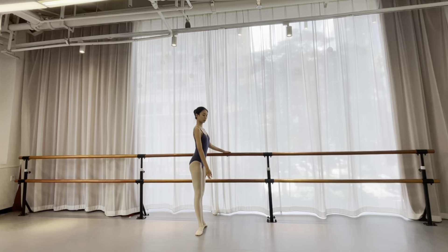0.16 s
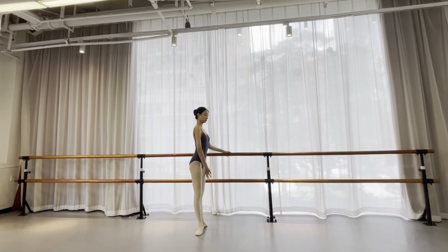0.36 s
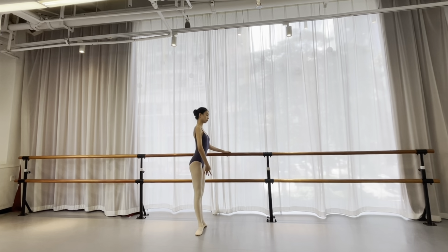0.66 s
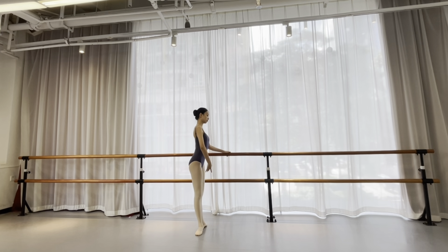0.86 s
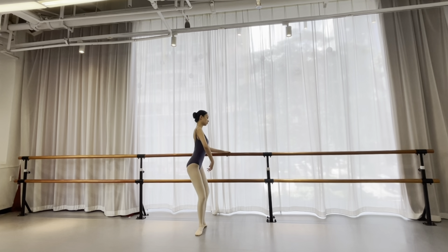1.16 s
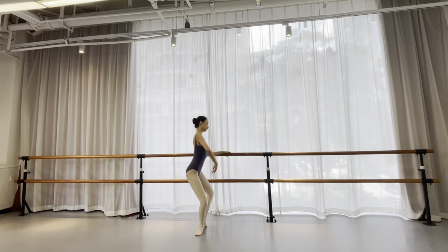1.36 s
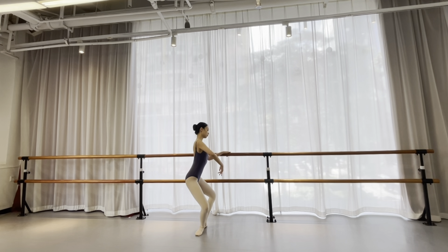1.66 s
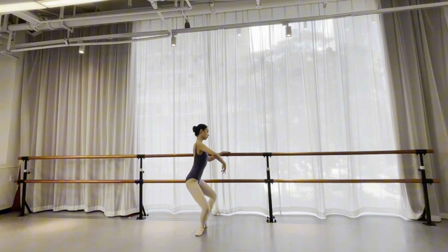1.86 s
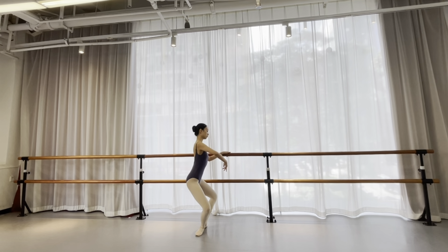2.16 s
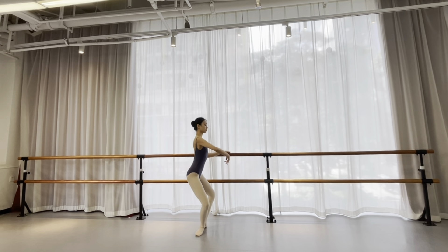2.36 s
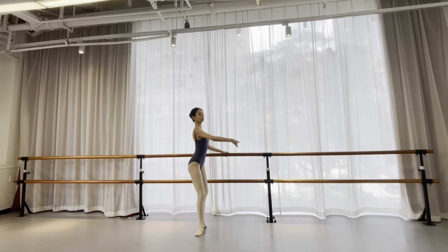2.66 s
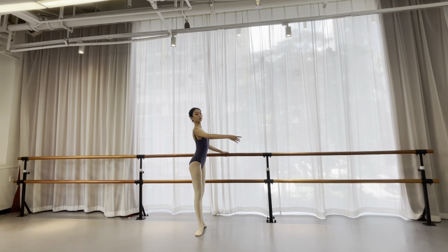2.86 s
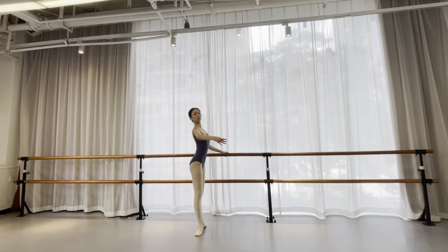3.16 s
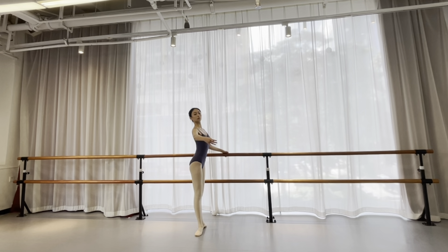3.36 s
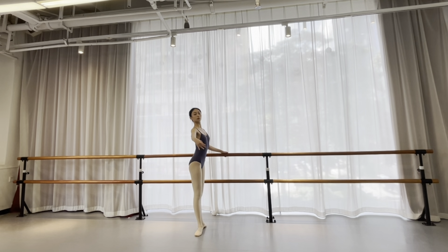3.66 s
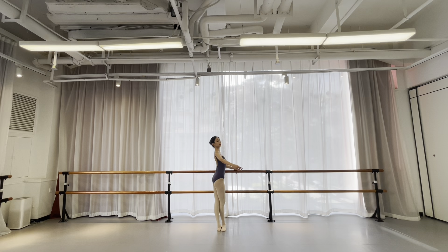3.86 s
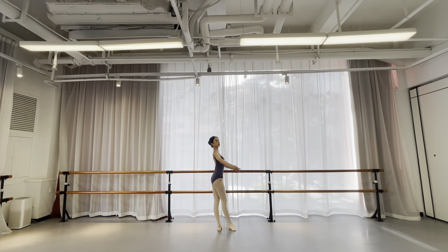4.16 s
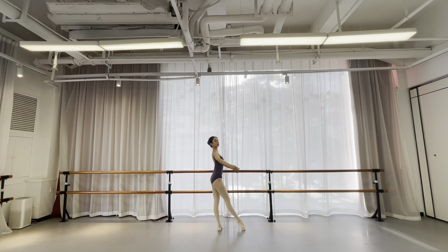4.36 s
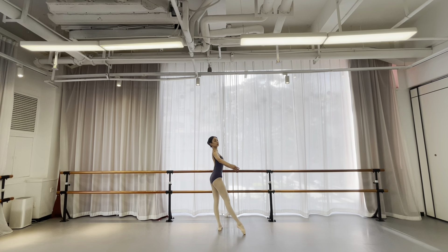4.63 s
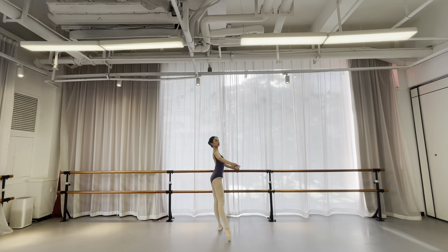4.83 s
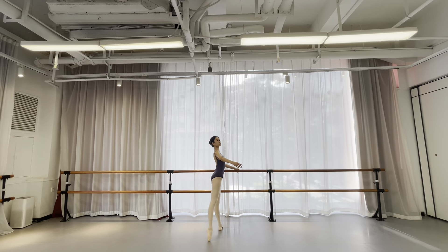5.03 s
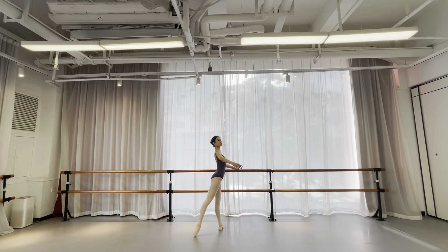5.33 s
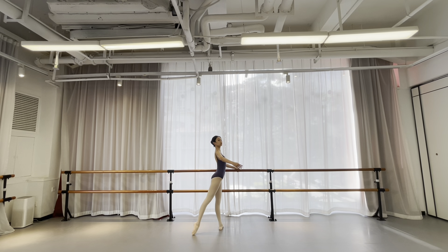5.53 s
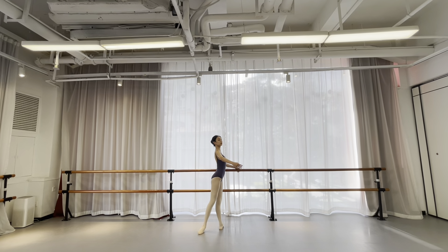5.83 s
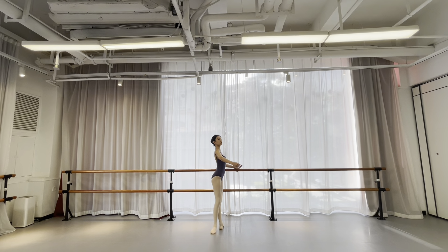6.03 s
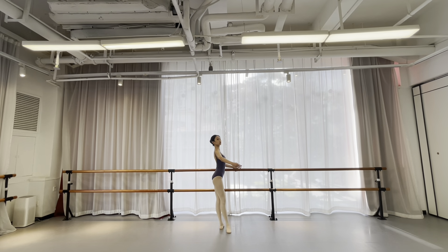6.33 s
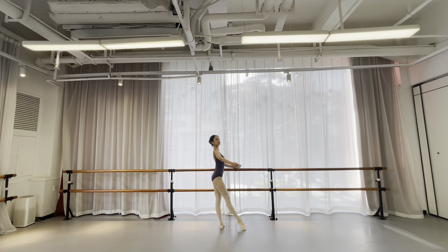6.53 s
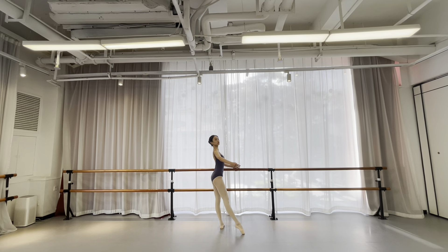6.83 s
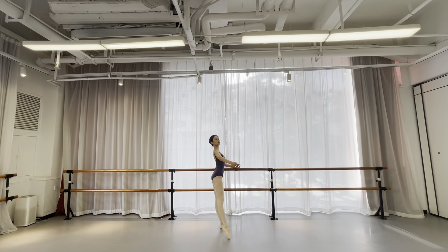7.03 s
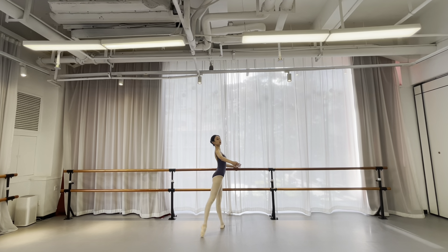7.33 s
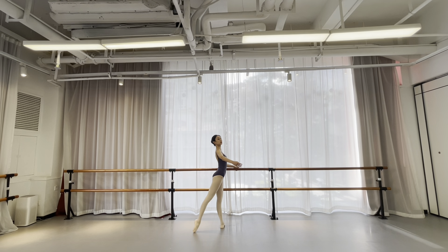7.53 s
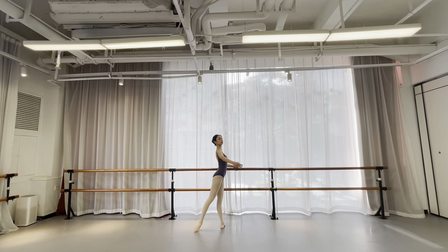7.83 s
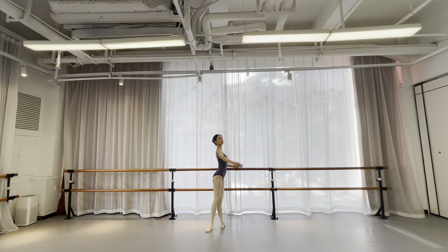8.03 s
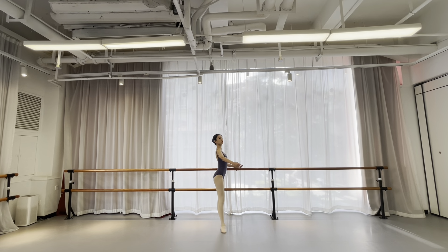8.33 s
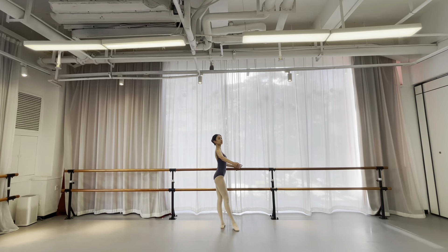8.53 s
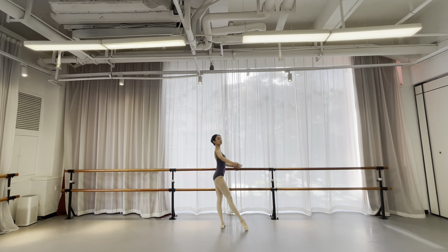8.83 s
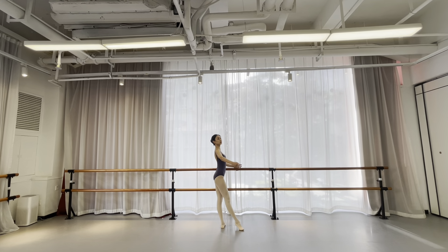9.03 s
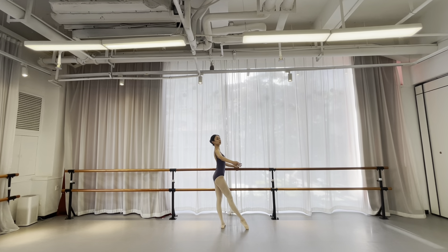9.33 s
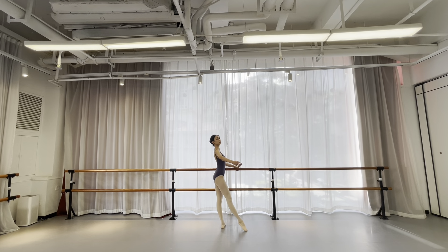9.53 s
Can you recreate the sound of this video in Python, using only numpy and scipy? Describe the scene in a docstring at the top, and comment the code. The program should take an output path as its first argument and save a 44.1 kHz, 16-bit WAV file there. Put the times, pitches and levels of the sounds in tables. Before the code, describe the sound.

A heartbeat picked up by contact dominates: heavy, muffled lub-dub pairs at about 65 a minute, the strongest clipped into a knock. A low lumpy hum lies beneath, with a thin hiss that stops at three seconds. Very faint slipper strokes brush the studio floor from just after one second, return past four seconds and crowd closer later, with tiny dry puffs. The sound is close and dry, without room reverberation.

```python
"""From the start a low hum and a thin hiss lie under a heartbeat heard by a contact pickup.
Deep, dull thuds come in lub-dub pairs, about 65 a minute: each is a few quick pushes on one heavy, damped
body. The strongest overload the pickup and knock; faint falling blips lead in the thuds and stray between.
After one second a dancer's slipper faintly brushes the floor, as swelling grains of friction noise.
At three seconds the hiss stops; later the strokes crowd closer and the sole catches in short, dry puffs."""
import sys
import numpy as np
from scipy import signal
from scipy.fft import rfft, irfft
from scipy.io import wavfile
from scipy.ndimage import map_coordinates

SR = 44100
rng = np.random.default_rng(int(sys.argv[2]) if len(sys.argv) > 2 else 0)


def digitize_waveform(pressure):
    """Quantize a signal to 16-bit integers and store it at the path in sys.argv[1].

    Rows of a 2-D input are taken as channels; values are limited to [-1, 1].
    """
    field = np.atleast_2d(pressure).T
    bounded = np.clip(field, -1, 1)
    quanta = np.round(bounded * 32767).astype(np.int16)
    wavfile.write(sys.argv[1], SR, quanta)


N = 427329


def gain_of(db):
    """Turns decibels into an amplitude factor."""
    return 10 ** (np.asarray(db) / 20)


def evened(x):
    """Scales a signal to rms 1."""
    return x / np.sqrt(np.mean(x ** 2) + 1e-20)


def coloured(x, points):
    """Shapes the spectrum of x by (frequency, level) points and scales it to rms 1."""
    point_hz, point_db = np.transpose(points)
    hz = np.fft.rfftfreq(N, 1 / SR)
    shape_db = np.interp(np.log(hz + 1), np.log(point_hz), point_db)
    return evened(irfft(rfft(x) * gain_of(shape_db), N))


def wander(per_s):
    """Makes slow random drift of rms 1, its changes rolled off around per_s [Hz]."""
    hz = np.fft.rfftfreq(N, 1 / SR)
    drift = rfft(rng.standard_normal(N)) * np.exp(-(hz / per_s) ** 2)
    return evened(irfft(drift, N))


def add(mix, at, sound):
    """Adds a sound into the mix at a time in seconds, trimmed to the ends of the mix."""
    start = round(at * SR)
    part = mix[max(start, 0):max(start + len(sound), 0)]
    part += sound[max(-start, 0):][:len(part)]


LAG_HZ = 61.25  # below this, waves arrive late


def bass_lag(hz):
    """Bass travels more slowly than treble, so every push arrives as a falling sweep."""
    return ((LAG_HZ - 1j * hz) / (LAG_HZ + 1j * hz)) ** 2


# relative spectrum of the body's drone between the thuds: (frequency [Hz], level [dB per Hz])
HUM_SPECTRUM = [(15, -45), (25, -13), (54, 2.5), (107, -1.5), (178, -5.5), (275, -11), (335, -18.5),
                (390, -23), (450, -29.5), (640, -40.5), (900, -53), (1500, -89.5)]


def hum(level_db=-54, lumpy_db=2.5, lumps_per_s=55, stir_db=1.8, stirs_per_s=9):
    """Countless small tremors of the same body merge into a lumpy drone that stirs now and then."""
    stir = stir_db * wander(stirs_per_s)
    lumps = lumpy_db * wander(lumps_per_s)
    tremor = rng.standard_normal(N) * gain_of(lumps + stir)
    delayed = irfft(rfft(tremor) * bass_lag(np.fft.rfftfreq(N, 1 / SR)), N)
    return gain_of(level_db) * coloured(delayed, HUM_SPECTRUM)


# relative spectrum of the thin steady hiss: (frequency [Hz], level [dB per Hz])
HISS_SPECTRUM = [(400, -6.5), (600, 5), (950, -4), (1300, -2.5), (2000, -2), (2500, -6), (3200, -13.5),
                 (7800, -17), (9000, -9), (10500, -16), (15500, -24)]


def hiss(level_db=-84, end_s=3.05, stop_s=0.008):
    """Coloured noise holds level, then stops short."""
    on = np.clip((end_s - np.arange(N) / SR) / stop_s, 0, 1)
    return gain_of(level_db) * on * coloured(rng.standard_normal(N), HISS_SPECTRUM)


# strokes of the slipper on the floor, levels before the slipper's own trims:
# (start [s], length [s], level of the soft rub [dB], level of the fizz [dB])
SLIPPER_STROKES = [(1.283, 0.77, -80.5, -78), (2.12, .7, -82, -79.5), (4.246, 0.42, -87.5, -80),
                   (4.423, 0.53, -81, -73.5), (4.793, 0.63, -79, -77), (5.23, 0.57, -85, -81),
                   (5.7, 0.83, -78, -74.5), (6, 0.35, -75.5, -74), (6.206, 0.68, -75, -68.5),
                   (6.64, 0.48, -75, -74.5), (6.886, 0.94, -79.5, -78.5), (7.612, 0.7, -83, -77.5),
                   (7.784, 0.56, -75, -74.5), (7.98, 0.32, -72.5, -73.5), (8.134, 0.63, -73, -68),
                   (8.653, 0.41, -75.5, -67), (8.894, 0.42, -74.5, -68.5), (9.242, 0.53, -73.5, -66.5),
                   (9.6, 0.41, -72.5, -70.5)]


def stroke_levels(rest_db=-104, skew=0.72, arch_power=0.9):
    """Each stroke is one arch in rub and fizz [dB]; overlapping strokes add in power over a faint rustle."""
    soft, fizz = np.full((2, N), gain_of(rest_db) ** 2)
    for at, length, soft_db, fizz_db in SLIPPER_STROKES:
        u = np.arange(0, 1, 1 / (length * SR))
        # a skew under 1 makes the stroke swell faster than it fades
        arch = np.sin(np.pi * u ** skew).clip(0) ** arch_power
        add(soft, at, (gain_of(soft_db) * arch) ** 2)
        add(fizz, at, (gain_of(fizz_db) * arch) ** 2)
    return 10 * np.log10(soft), 10 * np.log10(fizz)


def floor_echo(x, echo, delay_s=0.00048, sway=0.23, sway_per_s=4.0):
    """The sound also arrives off the floor; as the foot moves, the peaks of that comb glide."""
    moving_delay_s = delay_s * np.exp(sway * wander(sway_per_s))
    read_at = np.arange(N) - SR * moving_delay_s
    reflected = map_coordinates(x, [read_at], order=3, mode="wrap")
    return evened(x + echo * reflected)


# relative spectra of the slipper's soft rub, fizz and topmost sheen: (frequency [Hz], level [dB per Hz])
RUB_SPECTRUM = [(300, -16.5), (600, 4), (1000, 2), (2000, -3.5), (2600, -5), (3600, -5.5), (8000, -34)]
FIZZ_SPECTRUM = [(1300, -34), (2400, -14.5), (3600, -5), (5500, -1), (7200, -3), (8700, -4), (10000, -11.5),
                 (12000, -12.5), (15700, -8)]
SHEEN_SPECTRUM = [(4000, -27), (7000, 5), (8600, -3), (10500, -6), (12200, -8.5), (14800, -5),
                  (15700, -6.5)]


def slipper(soft_db=0.5, fizz_db=-1.5, sheen_db=-4.0, sheen_growth=0.58, flutter_db=0.43, flutter_per_s=45,
            uneven_db=1.4, uneven_per_s=12):
    """Fine friction grains swell and fade in long, slightly uneven strokes; a brisk stroke is brighter."""
    soft, fizz = stroke_levels()
    brisk = fizz - fizz.max()  # dB below the strongest fizz
    soft = soft + uneven_db * wander(uneven_per_s)
    fizz = fizz + uneven_db * wander(uneven_per_s)
    grains = rng.standard_normal((3, N))
    low = gain_of(soft_db + soft) * floor_echo(coloured(grains[0], RUB_SPECTRUM), echo=0.43)
    high = gain_of(fizz_db + fizz) * floor_echo(coloured(grains[1], FIZZ_SPECTRUM), echo=0.18)
    top = gain_of(sheen_db + fizz + sheen_growth * brisk) * coloured(grains[2], SHEEN_SPECTRUM)
    return (low + high + top) * gain_of(flutter_db * wander(flutter_per_s))


# moments where the sole catches on the floor: (time [s], relative level [dB], centre pitch [Hz])
SOLE_CATCHES = [(6.686, -75, 1300), (8.116, -62.5, 1090), (8.27, -59, 6340), (8.752, -62.5, 2600),
                (8.752, -58.5, 780), (9.287, -60, 8060)]


def catches(fade_s=0.0032, skirt_db=-18):
    """Each catch of the sole is a short dry puff of noise around one pitch."""
    out = np.zeros(N)
    for at, db, hz in SOLE_CATCHES:
        u = np.maximum(np.arange(N) / SR - at, 0) / fade_s
        envelope = 2 * np.sqrt(u) * np.exp(-u)
        peak = [(hz / 10, 3 * skirt_db), (hz / 2, skirt_db), (hz, 0),
                (hz * 2, skirt_db), (hz * 10, 3 * skirt_db)]
        out += gain_of(db) * envelope * coloured(rng.standard_normal(N), peak)
    return out


# stray blips, before the overload: (time [s], peak level [dB], starting pitch [Hz], length [s])
STRAY_BLIPS = [(.824, -37.5, 264, 0.018), (1.925, -45, 345, 0.013), (2.152, -47, 377, 0.022),
               (2.3495, -44, 400, 0.011), (3.091, -71, 1110, 0.0081), (4.539, -41.5, 294, .023),
               (6.198, -41, 290, 0.025), (6.688, -45.5, 606, 0.0042), (8.355, -44, 389, 0.023),
               (8.577, -57.5, 920, 0.011), (9.253, -57, 880, 0.012), (9.263, -49.5, 775, 0.015),
               (9.522, -32, 326, .022)]
# the blip leading into each lub, and into each dub:
# (lead [s], level against the thud's first push [dB], starting pitch [Hz], length [s])
LUB_LEAD_IN = (.0085, -22, 300, .014)
DUB_LEAD_IN = (.0072, -24, 370, .0135)


def blips(fall=1.41):
    """Each blip starts quickly, glides down in pitch and fades; one leads into every lub and dub."""
    rows = list(STRAY_BLIPS)
    for beats, lead_in in ((LUB_THUDS, LUB_LEAD_IN), (DUB_THUDS, DUB_LEAD_IN)):
        lead, rel_db, hz, length = lead_in
        rows += [(at - lead, db + rel_db, hz, length) for at, db, *_ in beats]
    out = np.zeros(N)
    for at, db, hz, length in rows:
        u = np.arange(0, 1, 1 / (length * SR))
        turns = np.cumsum(hz * np.exp(-fall * u)) / SR
        envelope = np.sin(np.pi * u ** 0.69) ** 2
        add(out, at, gain_of(db) * envelope * np.sin(2 * np.pi * turns))
    return out


BODY_HZ, BODY_Q = 58.5, 1.8  # the heavy body's resonance


def push(db, sharp_hz, size=16384):
    """An outward push, centred in its span, rings the body; a slow push leaves out its upper range."""
    hz = np.fft.rfftfreq(size, 1 / SR)
    s = 1j * hz / BODY_HZ
    body = s ** 2 / (s ** 2 + s / BODY_Q + 1) * bass_lag(hz)
    body *= (s / (s + 1)) ** 2  # the pickup lets slow pressure leak away
    ring = body * np.exp(-hz / sharp_hz)
    return gain_of(db) * np.roll(irfft(ring / abs(ring).mean()), size // 2)


# first thud of each pair, rocking out, in, out and settling; strengths before the overload:
# (time [s], opening push [dB], its sharpness [Hz], return push [dB], main push [dB], its sharpness [Hz])
LUB_THUDS = [(0.4264, -23, 49, -22, -22.5, 14), (1.3359, -18.5, 50, -19.5, -18.5, 20),
             (2.2605, -20, 51.6, -21, -18, 20.5), (3.1905, -20, 47.8, -21, -18.5, 22),
             (4.133, -22.5, 53.2, -21, -16.5, 22.2), (4.9671, -25, 64, -24, -19, 22),
             (5.7925, -23, 42, -21.5, -16.5, 23.4), (6.6955, -21, 41.8, -21, -21, 22.6),
             (7.6611, -21, 36.5, -20.5, -18, 24.6), (8.6585, -20, 37.3, -23, -19, 21.3),
             (9.651, -20, 49, -22, -22, 39)]
# second thud of each pair, split in two inward pushes:
# (time [s], strength [dB], sharpness [Hz], split [s], strength of the later push [dB])
DUB_THUDS = [(0.7701, -15.5, 37.8, 0.068, -24.5), (1.6925, -15, 38.2, 0.042, -23.5),
             (2.6193, -15, 37.4, .044, -25.5), (3.5476, -15, 36.8, .0477, -26),
             (4.4862, -14.4, 47, 0.064, -24.5), (5.3148, -15, 48.4, 0.068, -24),
             (6.1531, -15, 43.4, .0525, -24), (7.061, -15, 38, 0.039, -22.5),
             (8.0294, -14.5, 39, 0.038, -25.5), (9.0258, -15.5, 35.5, 0.048, -27.4)]
# single inward bumps outside the paired thuds: (time [s], strength [dB], sharpness [Hz])
SINGLE_BUMPS = [(.009, -26, 36.7), (1.9715, -33.5, 75), (2.0924, -35.5, 79.5), (2.3569, -22.5, 73.4),
                (2.373, -32, 27), (3.098, -35.5, 92), (4.689, -31.5, 65.6), (5.166, -36.5, 77.4),
                (8.3653, -29.5, 102), (9.2755, -28, 73.6), (9.551, -27.5, 37.5)]
# the rocking that all lubs share, timed from the opening push
RETURN_S, MAIN_S, SETTLE_S = 0.0114, 0.0277, 0.0465
RETURN_SHARP_HZ, SETTLE_SHARP_HZ = 24.4, 23.6
SETTLE_DB = -8  # against the main push
SPLIT_SHARP_HZ = 30.6  # the later push of a dub is soft


def thuds():
    """A lub rocks the body out and in twice, a dub pushes it in twice, a bump once."""
    outward, inward = 1, -1
    pushes = [(at, inward, db, sharp_hz) for at, db, sharp_hz in SINGLE_BUMPS]
    for at, db, sharp_hz, return_db, main_db, main_hz in LUB_THUDS:
        pushes += [(at, outward, db, sharp_hz),
                   (at + RETURN_S, inward, return_db, RETURN_SHARP_HZ),
                   (at + MAIN_S, outward, main_db, main_hz),
                   (at + SETTLE_S, inward, main_db + SETTLE_DB, SETTLE_SHARP_HZ)]
    for at, db, sharp_hz, split, later_db in DUB_THUDS:
        pushes += [(at, inward, db, sharp_hz),
                   (at + split, inward, later_db, SPLIT_SHARP_HZ)]
    out = np.zeros(N)
    for at, way, db, sharp_hz in pushes:
        thud = way * push(db, sharp_hz)
        add(out, at - len(thud) / 2 / SR, thud)
    return out


def overload(x, ceiling_db=-24.95):
    """The pickup cuts the tall swings flat; their corners give each strong thud its knock."""
    ceiling = gain_of(ceiling_db)
    return np.clip(x, -ceiling, ceiling)


def scene():
    """The pickup overloads on thuds, blips and hum; the slipper and the hiss lie over them."""
    heartbeat = overload(thuds() + blips() + hum())
    floor = slipper() + catches()
    return (heartbeat + floor + hiss())[None]


def record(dry, edge_hz=15750):
    """The recorder's band limit is a steep low-pass filter."""
    band_limit = signal.firwin(511, edge_hz, window=("kaiser", 9), fs=SR)
    return signal.oaconvolve(dry, band_limit[None], "same")


dry = scene()
out = record(dry)
digitize_waveform(out)
```